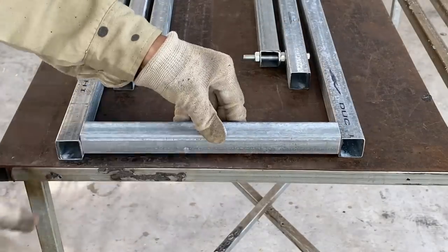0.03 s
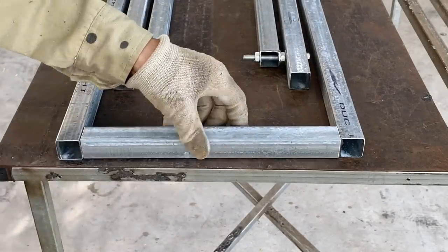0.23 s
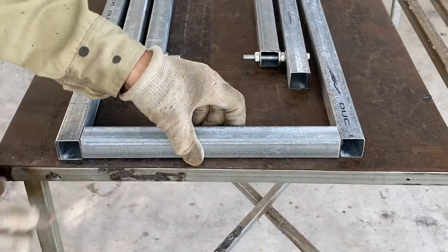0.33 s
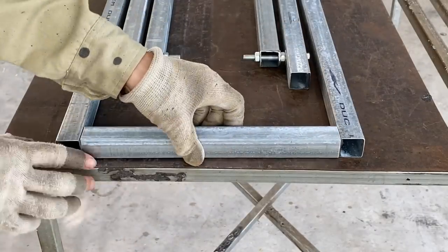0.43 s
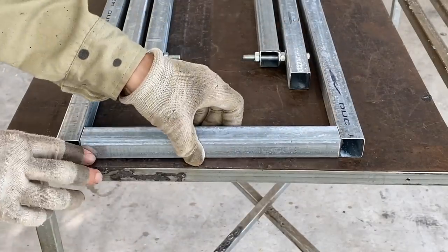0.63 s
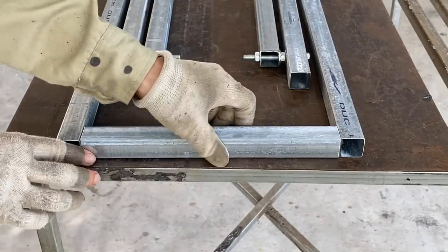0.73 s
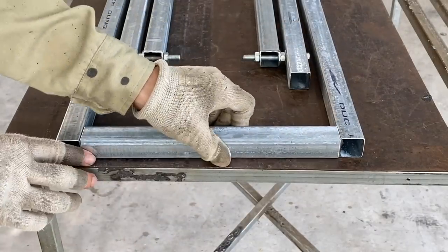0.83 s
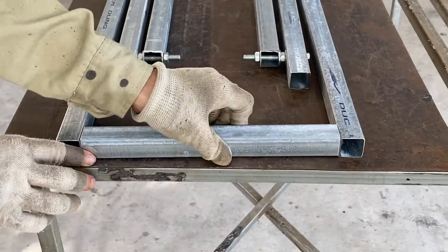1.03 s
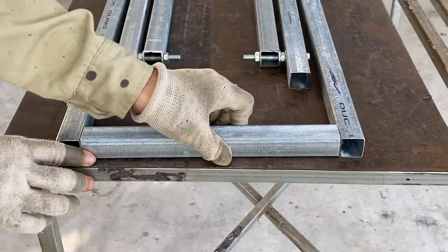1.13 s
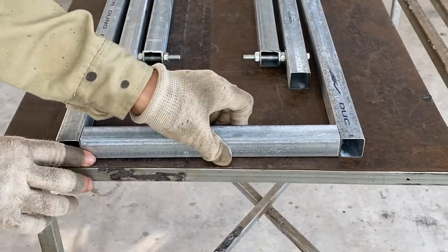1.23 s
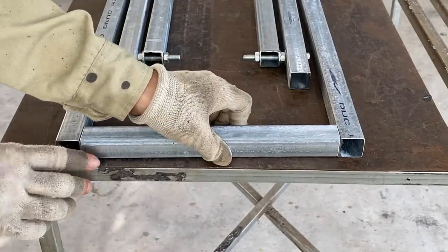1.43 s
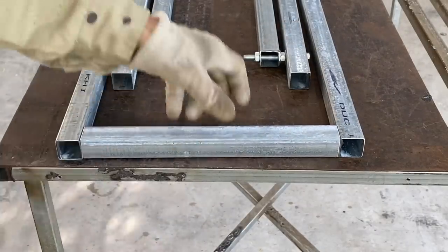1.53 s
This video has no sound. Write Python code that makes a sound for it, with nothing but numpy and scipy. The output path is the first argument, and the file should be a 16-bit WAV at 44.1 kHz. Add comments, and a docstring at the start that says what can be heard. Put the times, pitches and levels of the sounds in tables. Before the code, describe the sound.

A steel tube gives one sharp clank as it is set into a metal frame, just after a light scrape. The workbench thuds beneath it and the ring dies quickly in the workshop, leaving a faint outdoor rumble.

```python
"""A square steel tube clanks once as a gloved hand sets it between the rails of a frame on a workbench.
Friction gives a graze, and a thin hiss swells straight into the clank: rapid impacts excite the tube's
normal modes and rattle the frame, the high modes being damped as the tube seats. The bench thuds and
the workshop reverberates. The glove rubs faintly on the steel, over a low outdoor rumble and a distant
bird repeating one falling chirp."""
import sys
import numpy as np
from scipy import signal
from scipy.fft import rfft, irfft
from scipy.io import wavfile
from scipy.ndimage import uniform_filter1d

SR = 44100
rng = np.random.default_rng(int(sys.argv[2]) if len(sys.argv) > 2 else 0)


def waveform_to_disk(signal):
    """Save audio, clipped to [-1, 1], as 16-bit WAV at the path in sys.argv[1]."""
    frames = np.transpose(np.atleast_2d(signal))
    scaled = np.clip(frames, -1, 1) * 32767
    samples = np.round(scaled).astype(np.int16)
    wavfile.write(sys.argv[1], SR, samples)


N = 70560

# outdoor background (frequency [Hz], relative spectral level [dB])
AIR_SPECTRUM = [(15, -39.5), (25, -17), (70, 0), (145, -2.5), (250, -11), (330, -9), (600, -17.5),
                (950, -18.7), (1750, -19.8), (2550, -27.5), (4100, -33), (6500, -43.5), (10000, -47),
                (16000, -57)]
# likeness of the background at the two ears (frequency [Hz], correlation [1])
AIR_CORRELATION = [(40, .35), (150, 0.346), (500, 0.15), (2000, .1), (12000, .1)]
# boost of the background's bass (time [s], level [dB])
RUMBLE_ENVELOPE = [(0, 6.5), (0.14, 2.5), (0.5, 2.5), (0.88, -3), (1.05, -0.5), (1.35, -1.5), (1.6, -1.5)]
# glove rubbing on steel (time [s], level [dB])
RUB_ENVELOPE = [(0, -77), (0.2, -82), (0.42, -96), (0.5, -73), (0.57, -73), (0.649, -77.5), (0.71, -76),
                (0.79, -89), (0.85, -78), (0.96, -85), (1.18, -77), (1.3, -82.5), (1.43, -75),
                (1.55, -95.5)]
# friction of cloth on steel (frequency [Hz], relative spectral level [dB])
RUB_SPECTRUM = [(1000, -11.5), (4000, 2), (7000, -3), (10500, 1.5), (13000, -3), (16000, -10)]
# tube grazing the rails
# (time [s], duration [s], level [dB], ring frequency [Hz], ring re scuff [dB], ring T60 [s])
GRAZE_EVENTS = [(0.108, .03, -59.5, 5130, -6, .2), (0.695, .028, -68.5, 9150, -4, .04)]
# thin hiss of the grazes and of the swell (frequency [Hz], relative spectral level [dB])
HISS_SPECTRUM = [(200, -9), (1400, -1), (4000, -2), (7500, -4), (9000, 3.5), (10300, 4.5), (12000, -4.5),
                 (14500, -3), (16000, -14.5)]
# workshop reverberation (frequency [Hz], relative level [dB], T60 [s])
ROOM_BANDS = [(80, -0.5, .5), (350, -2, .35), (705, -4, 0.22), (1700, 2.5, .22), (2800, -1.5, .19),
              (4210, -10, .18), (6000, -7.5, 0.21), (10000, -3.5, .18), (16000, -7.5, .16)]
# tube striking the frame, and one later nudge (time [s], relative force [dB], low-pass cutoff [Hz])
IMPACTS = [(0.2264, -3, 7000), (0.2281, -3, 7000), (0.23, -3, 9000), (0.2312, -1.8, 8000),
           (0.2336, -7.5, 9000), (0.2368, -7.5, 5000), (0.2397, -7.5, 1300), (0.2425, -4.5, 1100),
           (1.194, -32, 1000)]
# normal modes of the gripped tube (frequency [Hz], relative level [dB], T60 [s])
TUBE_MODES = [(723, -36, .2), (841, -25, .1), (892, -27, .2), (1075, -27, .18), (1195, -18, .19),
              (1245, -18, .15), (1415, -24, .08), (1490, -21, .19), (1648, -28, .21), (1770, -25, .18),
              (1841, -25, .14), (2085, -20, .08), (2346, -24, .18), (2538, -20, .07), (2856, -14, .05),
              (3246, -31, .13), (3646, -21, .09), (3990, -20, .08), (4187, -4, 0.043), (4800, -19, .05),
              (5167, -16.5, .04), (5750, -15, .045), (6410, -17, 0.04), (8090, -15, .04), (8800, -3, .045),
              (10300, -15, .04), (12690, -11, .03), (14210, -16, .03)]
# tube's modes arriving out of step at the two ears (frequency [Hz], phase difference [cycles])
TUBE_PHASE_SPLIT = [(700, .12), (1800, .08), (4000, .03), (6400, .04), (8700, .34), (14000, .3)]
# dense rattle of the frame (frequency [Hz], relative spectral level [dB])
RATTLE_SPECTRUM = [(60, -28), (200, -7.5), (400, -4), (750, -4), (1200, -1), (1900, -7), (2600, -4.5),
                   (5500, -1), (7300, -17), (10000, -11), (14000, -14.5), (16000, -22)]
# blows and nudges on the bench (time [s], relative level [dB])
BENCH_BLOWS = [(0.2293, -41.5), (0.2691, -47), (0.490, -63), (0.710, -65), (1.555, -62)]
# normal modes of the bench top (frequency [Hz], relative level [dB], T60 [s])
BENCH_MODES = [(88, -7, .35), (127, -11, .3), (173, -12, .4), (196, -15, .4), (236, -7, .36),
               (300, -11.5, .4), (327, -10, .42), (351, 4, .12), (370, -6, .39), (409.6, -5, .42),
               (436, 1.5, .24)]
# bird chirps (time [s], relative level [dB])
BIRD_CHIRPS = [(0.470, -73), (0.638, -73.5), (0.801, -71.5), (0.973, -72.5), (1.141, -70.5), (1.316, -72),
               (1.483, -73)]

BENCH_PAN_DB = -1.6  # left re right, for the clank and the thuds


def amp(db):
    """Amplitude ratio of a level in decibels."""
    return 10 ** (np.asarray(db) / 20)


def unit(x):
    """Normalisation to an rms of 1."""
    return x / np.sqrt(np.mean(x ** 2) + 1e-20)


def decay(t, t60):
    """Exponential damping: 1 until t = 0, then down 60 dB every t60 seconds."""
    return np.exp(-np.log(1000) * np.maximum(t, 0) / t60)


def read(table, hz, column=1):
    """Interpolation of a table column along log frequency."""
    rows = np.array(table, float)
    return np.interp(np.log(hz + 1), np.log(rows[:, 0] + 1), rows[:, column])


def add(mix, start, sound):
    """Superposition of a sound on the mix from a start time in seconds."""
    part = mix[..., max(round(start * SR), 0):][..., :sound.shape[-1]]
    part += sound[..., :part.shape[-1]]


def pan(db):
    """Left and right gains for an interaural level difference."""
    return amp([[db / 2], [-db / 2]])


def colour(x, spectrum, size=4096):
    """Minimum-phase filtering to a spectral shape, with unit power gain for white noise."""
    log_gain = np.log(amp(read(spectrum, abs(np.fft.fftfreq(size, 1 / SR)))))
    taps = np.fft.ifft(np.exp(np.conj(signal.hilbert(log_gain)))).real[:size // 2]
    return signal.fftconvolve(x, taps[None] / np.linalg.norm(taps), axes=1)[:, :x.shape[1]]


def coloured_noise(spectrum, samples):
    """Spectral shaping of white stereo noise, scaled to an rms of 1."""
    return unit(colour(rng.standard_normal((2, samples)), spectrum))


def air(level_db=-56, pan_db=-1.3, rumble_hz=300, patch_db=2.5):
    """Partially coherent noise: a lumpy distant rumble eases off under a soft hiss."""
    frames, hz = N // 512 + 5, np.fft.rfftfreq(2048, 1 / SR)
    a, b, c, d, patches = rng.standard_normal((frames, len(hz), 5)).T
    left, independent = a + 1j * b, c + 1j * d
    correlation = read(AIR_CORRELATION, hz)[:, None]
    right = correlation * left + np.sqrt(1 - correlation ** 2) * independent
    # the level wanders in patches of frequency and time
    patches = unit(uniform_filter1d(uniform_filter1d(patches, size=12, axis=0), size=6, axis=1))
    boost_db = np.interp(np.arange(frames) * 512 / SR, *np.transpose(RUMBLE_ENVELOPE))
    bass_db = boost_db / (1 + (hz[:, None] / rumble_hz) ** 2)
    gain = amp(read(AIR_SPECTRUM, hz)[:, None] + patch_db * patches + bass_db)
    noise = signal.istft(np.array([left, right]) * gain, nperseg=2048, noverlap=1536)[1][:, :N]
    return amp(level_db) * unit(noise) * pan(pan_db)


def glove():
    """Sliding friction: knitted cloth hisses softly as it shifts on the steel."""
    level_db = np.interp(np.arange(N) / SR, *np.transpose(RUB_ENVELOPE))
    return amp(level_db) * coloured_noise(RUB_SPECTRUM, N)


def grazes(beat_hz=33, twin_db=-7):
    """Frictional excitation: the tube scuffs the rails, waking two close modes that beat."""
    out, t = np.zeros((2, N)), np.arange(SR // 5) / SR
    for start, length, db, ring_hz, ring_db, ring_t60 in GRAZE_EVENTS:
        taper = signal.windows.tukey(int(length * SR), .9)
        add(out, start, amp(db) * taper * coloured_noise(HISS_SPECTRUM, len(t))[:, :len(taper)])
        since_peak = t - length / 2
        envelope = np.minimum(2 * t / length, 1) * decay(since_peak, ring_t60)
        mode = np.sin(2 * np.pi * ring_hz * since_peak)
        twin = amp(twin_db) * np.sin(2 * np.pi * (ring_hz + beat_hz) * since_peak)
        add(out, start, amp(db + ring_db) * envelope * (mode + twin))
    return out


def workshop(x, delay_s=.0058, build_s=.0057):
    """Diffuse reverberation: a random tail for each ear and source position; bass lasts longest."""
    hz, t, bands = signal.stft(rng.choice([-1., 1.], (2, SR // 2)), SR, nperseg=256)
    t60 = read(ROOM_BANDS, hz, column=2)[:, None]
    bands = bands * amp(read(ROOM_BANDS, hz))[:, None] * decay(t, t60)
    bands *= np.sqrt(2 * np.log(1000) / (SR * t60))  # makes band energy independent of T60
    tail = signal.istft(bands, SR, nperseg=256)[1]
    tail *= np.clip((np.arange(tail.shape[1]) / SR - delay_s) / build_s, 0, 1)
    return signal.fftconvolve(x, tail, axes=1)[:, :x.shape[1]]


def swell(length_s=.025, peak_db=-41.5):
    """Amplitude envelope on noise: a thin hiss swells straight into the clank."""
    remaining_s = np.arange(int(length_s * SR))[::-1] / SR
    rise = (1 - remaining_s / length_s) ** .9
    hiss = coloured_noise(HISS_SPECTRUM, N)[:, -len(rise):]
    out = np.zeros((2, N))
    add(out, IMPACTS[0][0] - length_s, amp(peak_db) * rise * hiss)
    return out


def tube(start, t, gain_db=-21, seat_s=.2365, seat_t60=.026, choked_above_hz=4080):
    """Free vibration of the tube after one impact; seating adds damping to the high modes."""
    choke = decay(t + start - max(seat_s, start), seat_t60)
    out = np.zeros((2, len(t)))
    for k, (hz, db, t60) in enumerate(TUBE_MODES):
        envelope = amp(db) * decay(t, t60) * (choke if hz > choked_above_hz else 1)
        polarity = (-1) ** k  # neighbouring modes swing opposite ways
        lead = polarity * read(TUBE_PHASE_SPLIT, hz) * np.array([[.5], [-.5]])
        out += polarity * envelope * np.sin(2 * np.pi * (hz * t + lead))
    return amp(gain_db) * out


def frame_rattle(samples, gain_db=-2.6, t60=.048, width=.5, size=2048):
    """Heavily damped, dense vibration: the frame answers an impact with a pitchless burst."""
    fade = decay(np.arange(size) / SR, t60)
    spectrum = rfft(rng.standard_normal((2, size)) * fade)
    whitened = irfft(spectrum / (abs(spectrum) + 1e-12))  # no pitch sticks out
    mid, side = unit(whitened * np.sqrt(fade)) / np.sqrt(size)
    burst = np.zeros((2, samples))
    add(burst, 0, np.array([mid + width * side, mid - width * side]))
    return amp(gain_db) * colour(burst, RATTLE_SPECTRUM)


def clank(tube_send_db=-17):
    """Impact excitation: each contact drives tube, frame and room; softer contact passes less treble."""
    out, t = np.zeros((2, N)), np.arange(SR // 3) / SR
    for start, force_db, cutoff_hz in IMPACTS:
        ringing, rattle = tube(start, t), frame_rattle(len(t))
        blow = ringing + rattle + workshop(rattle + amp(tube_send_db) * ringing)
        pole = np.exp(-2 * np.pi * cutoff_hz / SR)
        add(out, start, amp(force_db) * signal.lfilter([1 - pole], [1, -pole], blow))
    return out * pan(BENCH_PAN_DB)


def bench(radiated_band_hz=(95, 560)):
    """Modal response: the top thuds at the blow, as the frame settles, and faintly as the hands shift."""
    thuds = np.zeros(N)
    for start, blow_db in BENCH_BLOWS:
        t = np.maximum(np.arange(N) / SR - start, 0)
        for hz, db, t60 in BENCH_MODES:
            thuds += amp(blow_db + db) * decay(t, t60) * np.sin(2 * np.pi * hz * t)
    radiation = signal.butter(2, radiated_band_hz, "band", fs=SR, output="sos")
    return signal.sosfilt(radiation, thuds) * pan(BENCH_PAN_DB)


def bird(top_hz=6000, end_hz=2698, length_s=.028, echo_hold_s=.038, echo_t60=.19):
    """Multipath propagation: each falling whistle is smeared by its own cluster of echoes."""
    out, t = np.zeros((2, N)), np.arange(SR // 2) / SR
    hz = top_hz * (end_hz / top_hz) ** np.linspace(0, 1, int(length_s * SR))
    chirp = unit(signal.windows.tukey(len(hz), .4) * np.sin(2 * np.pi * np.cumsum(hz) / SR))
    for start, db in BIRD_CHIRPS:
        echoes = rng.standard_normal((2, len(t))) * decay(t - echo_hold_s, echo_t60)
        echoes *= 2 / np.linalg.norm(echoes[0])
        add(out, start, amp(db) * signal.fftconvolve(chirp[None], echoes, axes=1))
    return out


def scene(bench_send_db=-3):
    """Linear superposition of the steel, the bench, their room and the outdoors behind."""
    thuds, scuffs = bench(), grazes()
    room = workshop(scuffs + amp(bench_send_db) * thuds)
    return clank() + swell() + thuds + scuffs + room + glove() + bird() + air()


def record(dry):
    """Band limiting: a linear-phase low-pass at 16 kHz."""
    taps = signal.firwin(511, 16000, window=("kaiser", 9), fs=SR)
    return signal.oaconvolve(dry, taps[None], "same")


dry = scene()
out = record(dry)
waveform_to_disk(out)
```